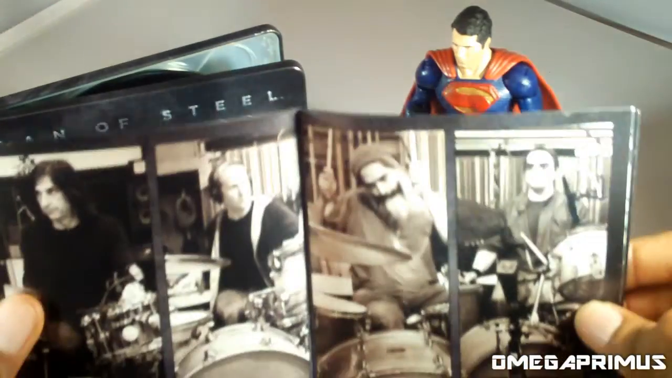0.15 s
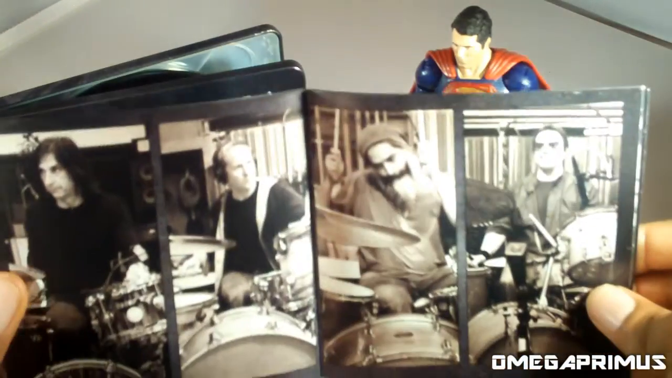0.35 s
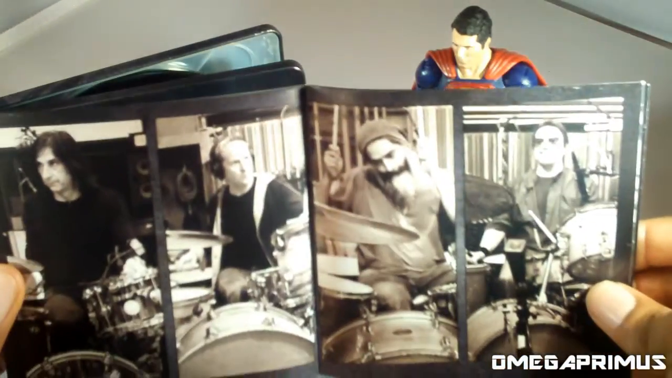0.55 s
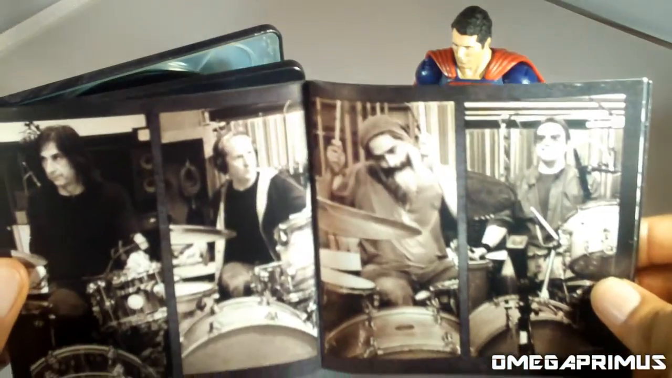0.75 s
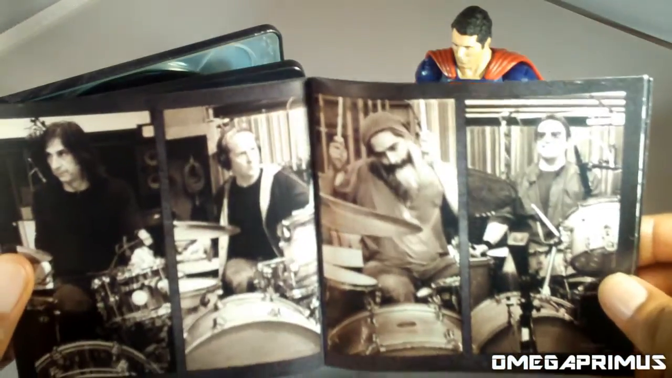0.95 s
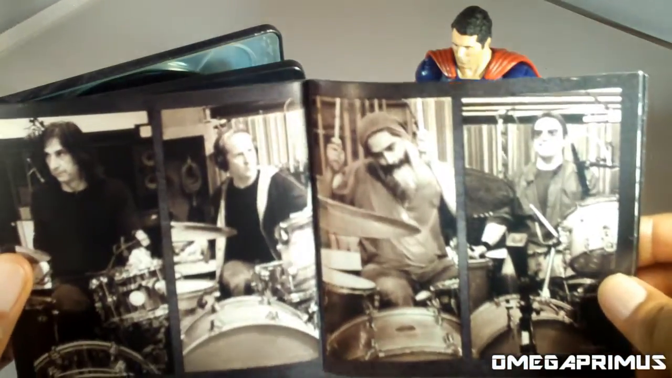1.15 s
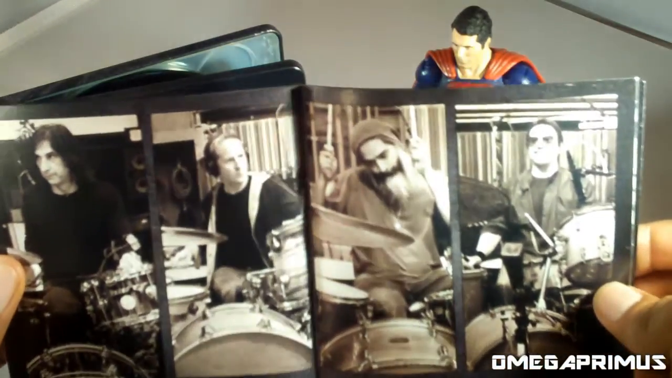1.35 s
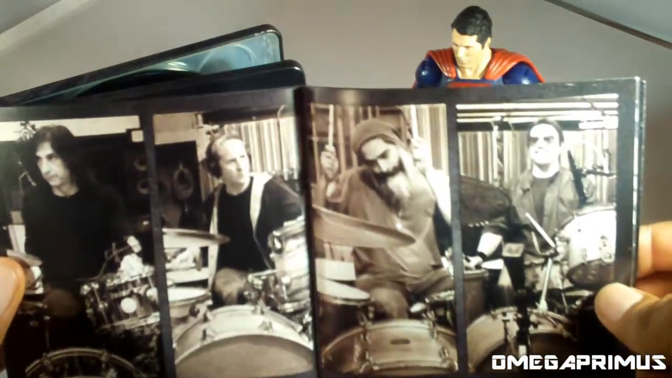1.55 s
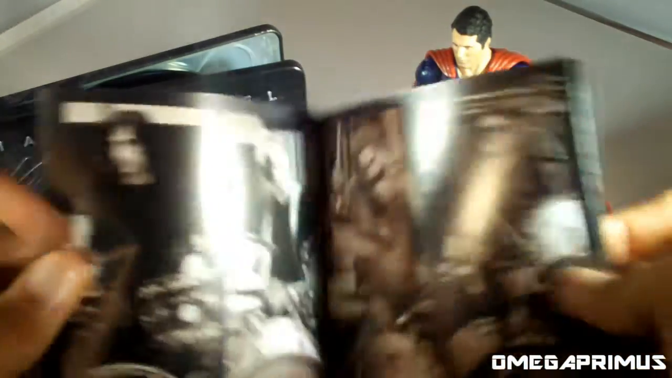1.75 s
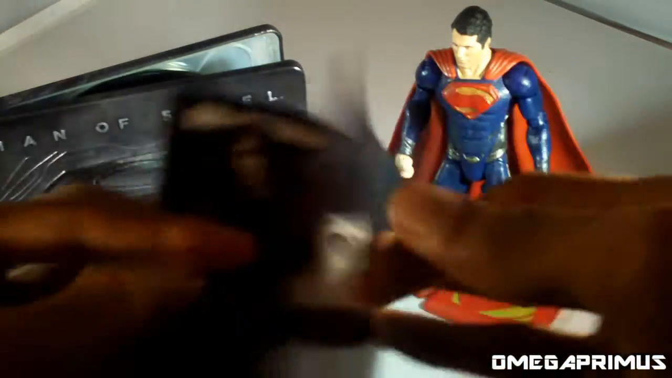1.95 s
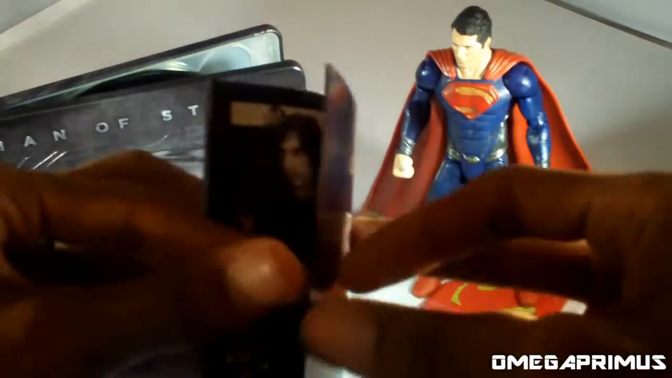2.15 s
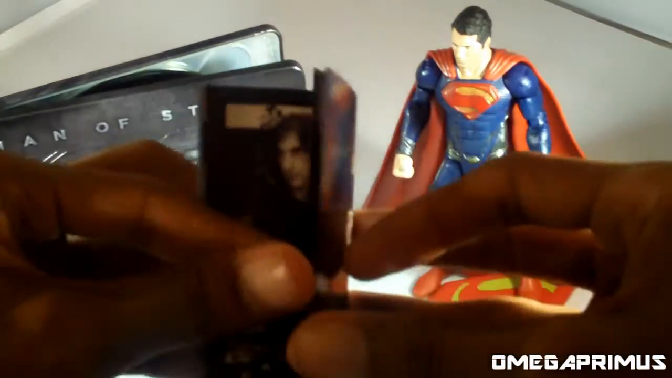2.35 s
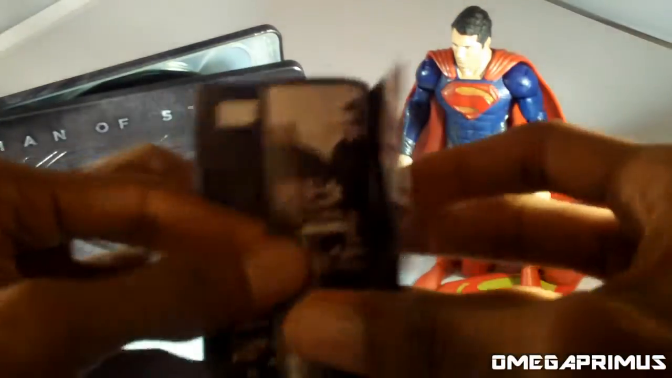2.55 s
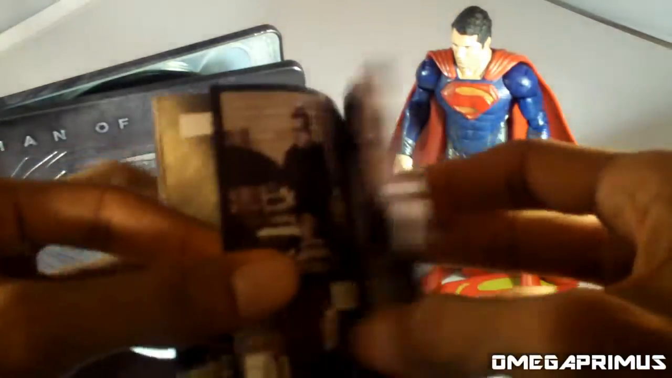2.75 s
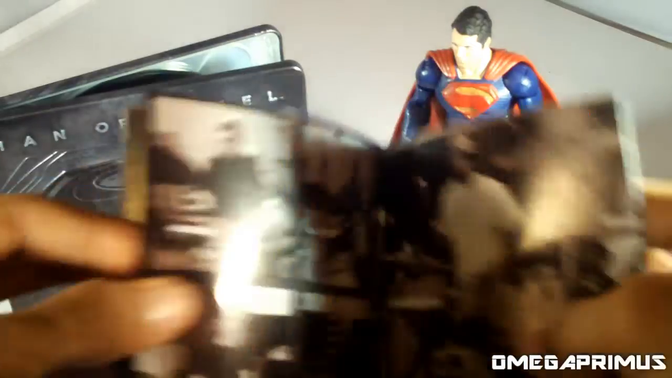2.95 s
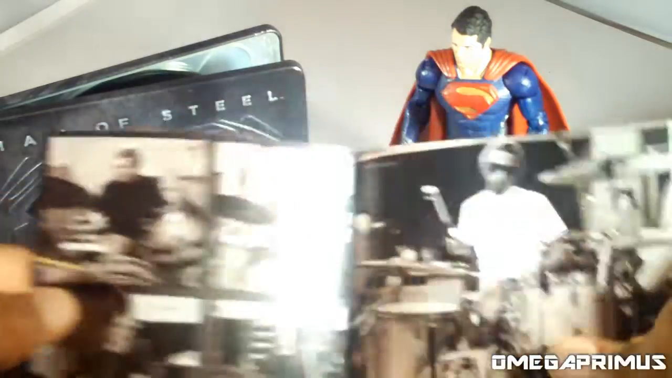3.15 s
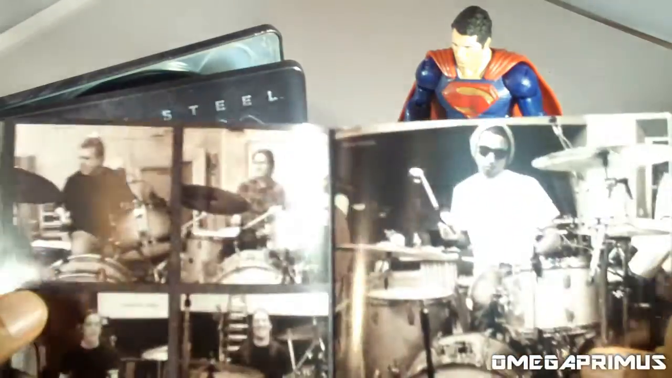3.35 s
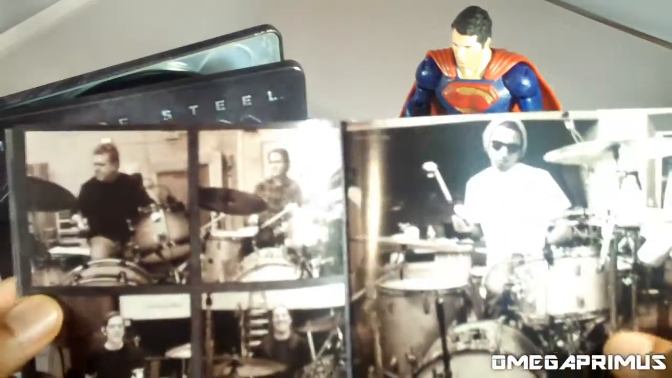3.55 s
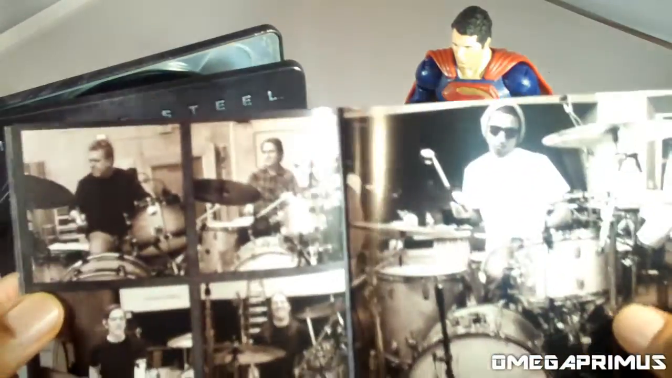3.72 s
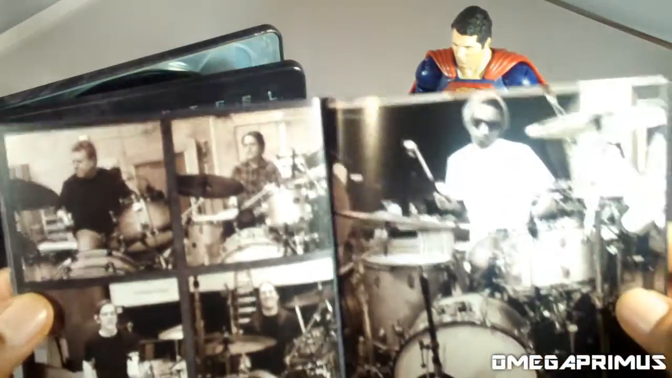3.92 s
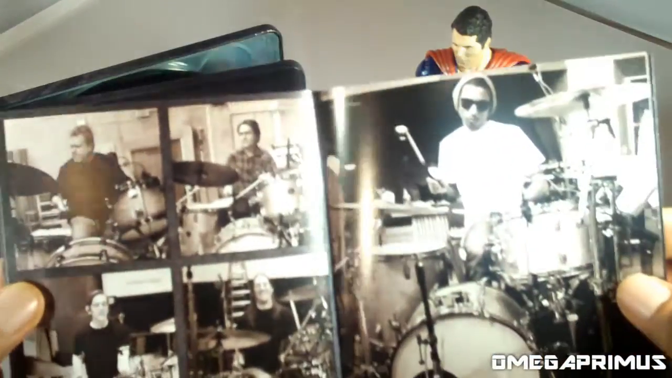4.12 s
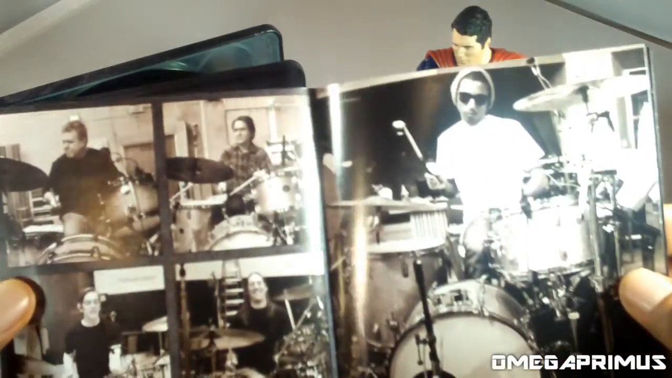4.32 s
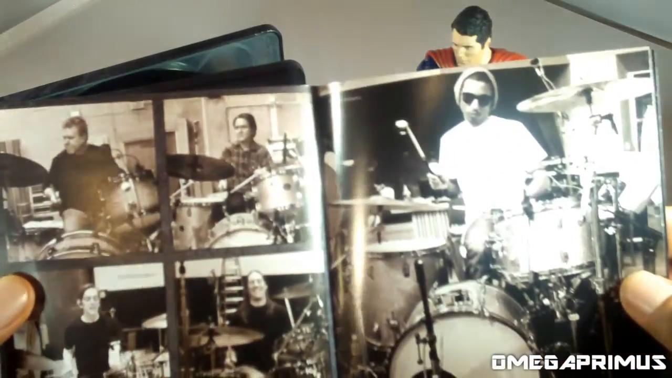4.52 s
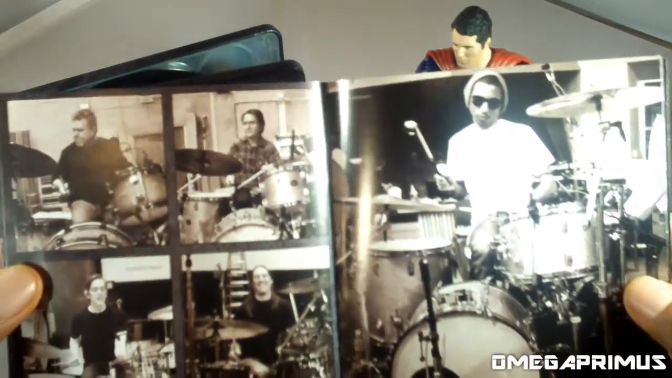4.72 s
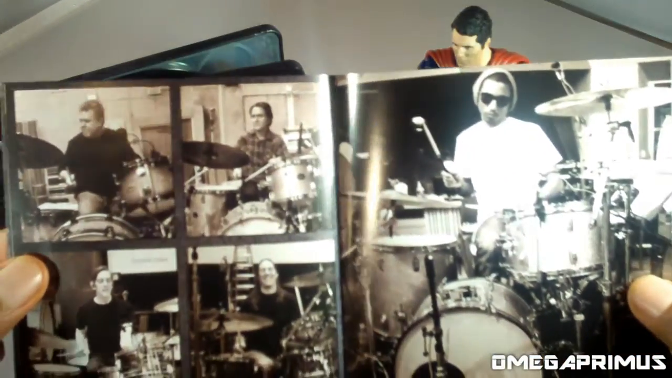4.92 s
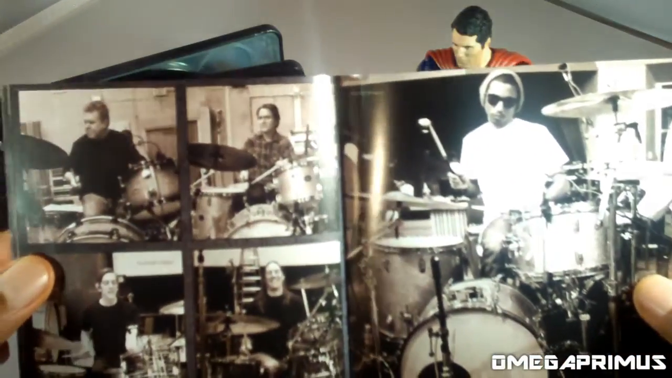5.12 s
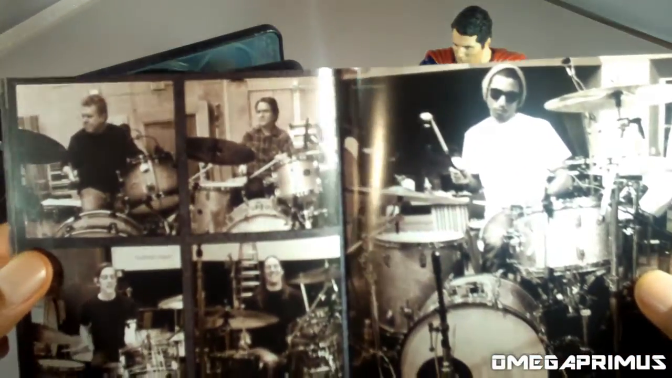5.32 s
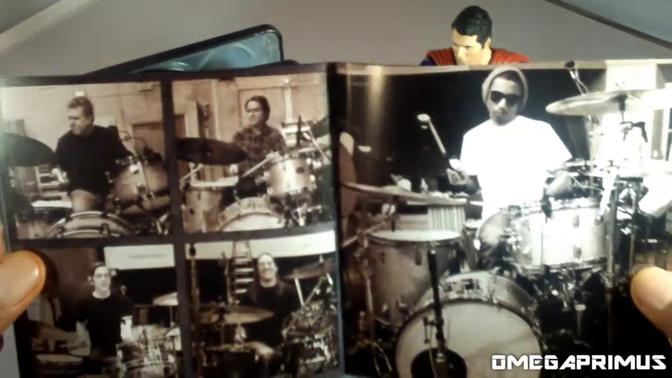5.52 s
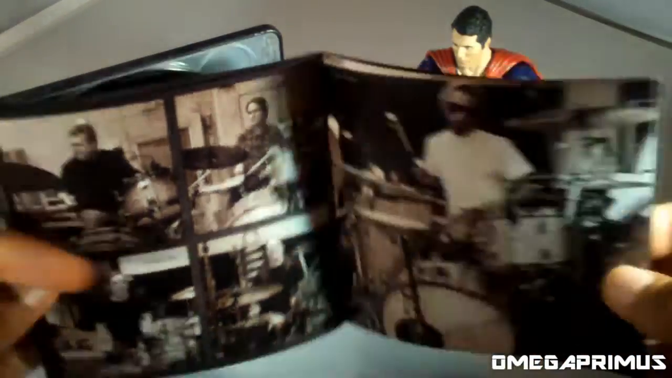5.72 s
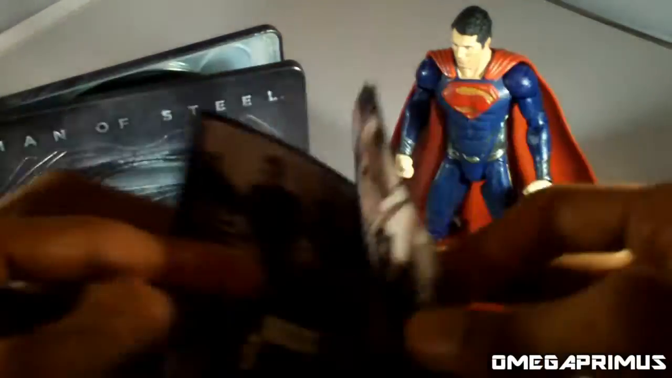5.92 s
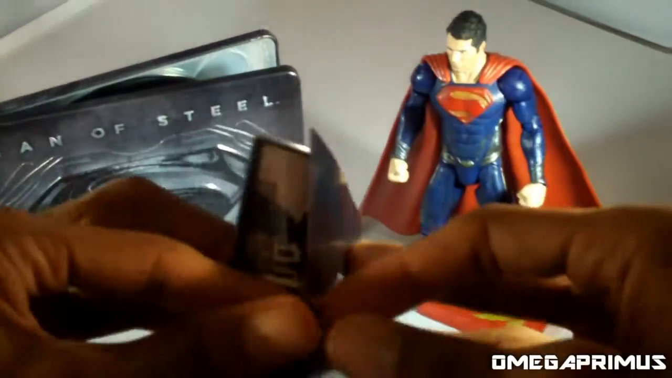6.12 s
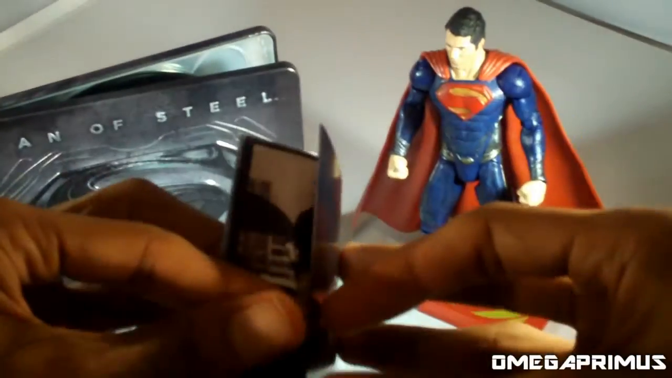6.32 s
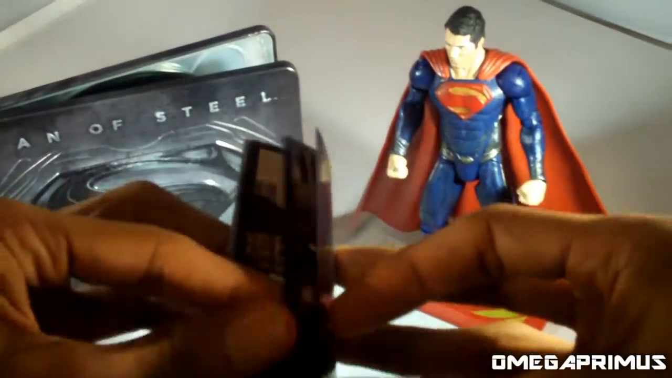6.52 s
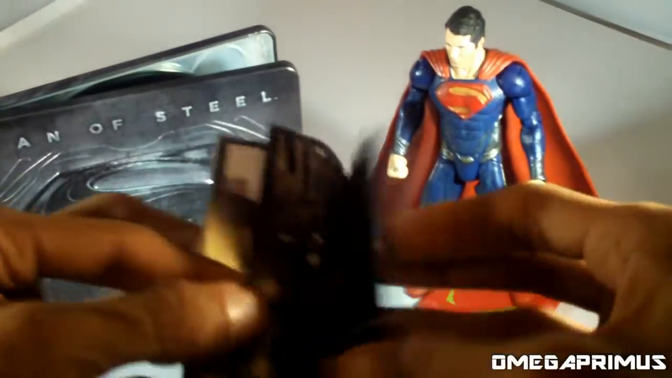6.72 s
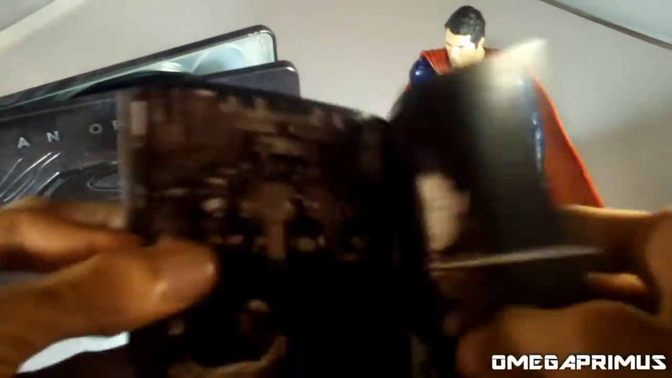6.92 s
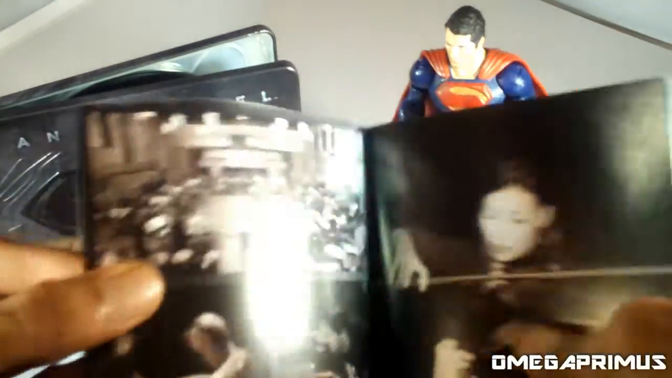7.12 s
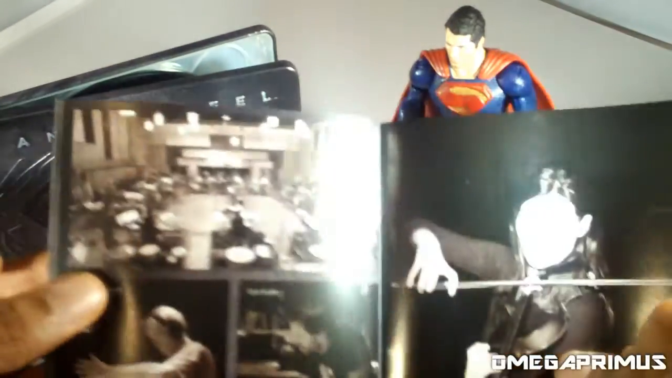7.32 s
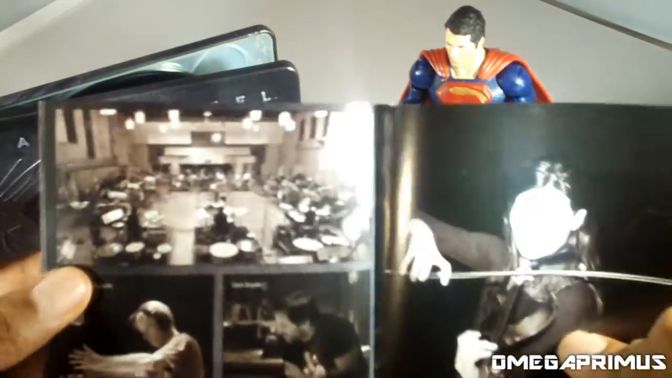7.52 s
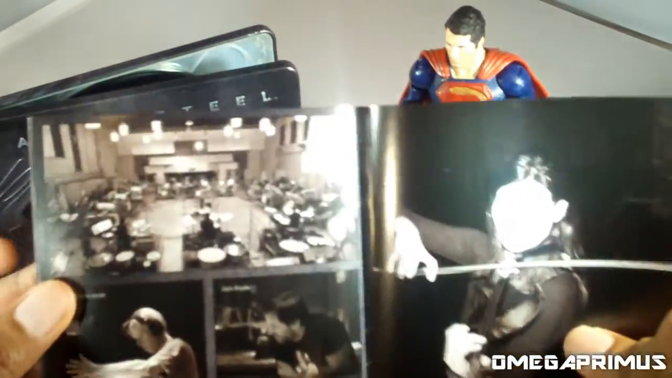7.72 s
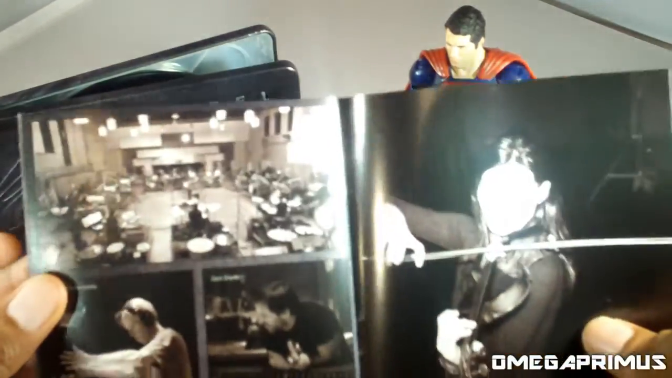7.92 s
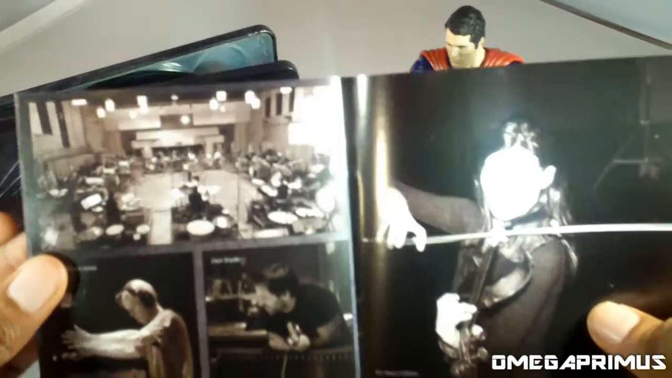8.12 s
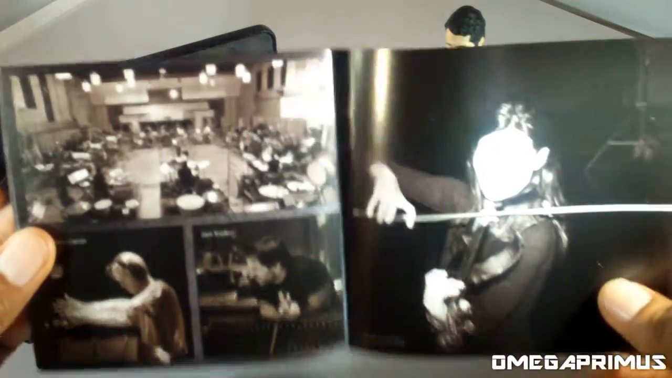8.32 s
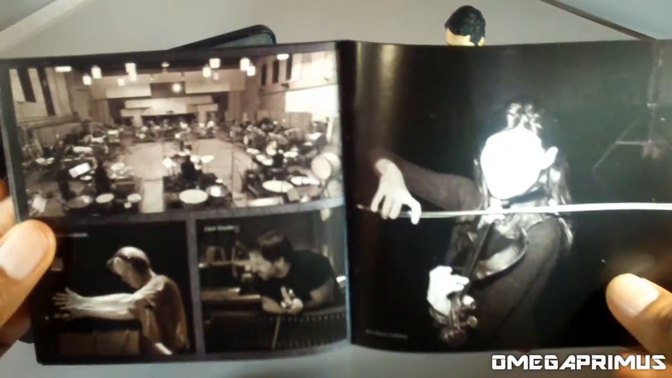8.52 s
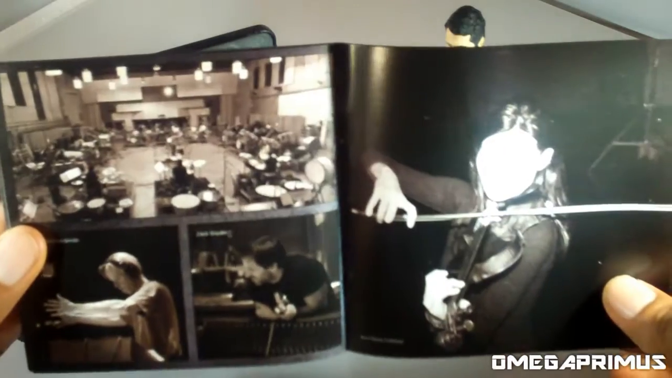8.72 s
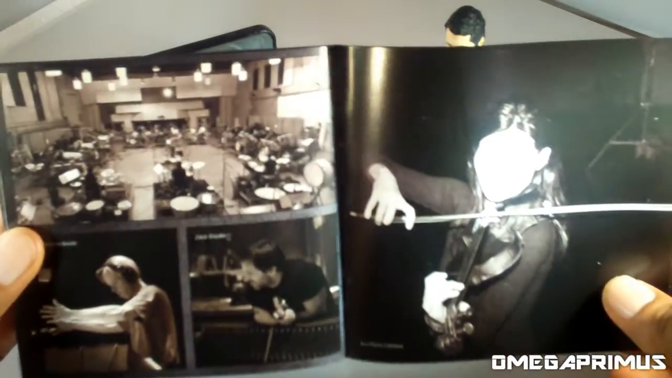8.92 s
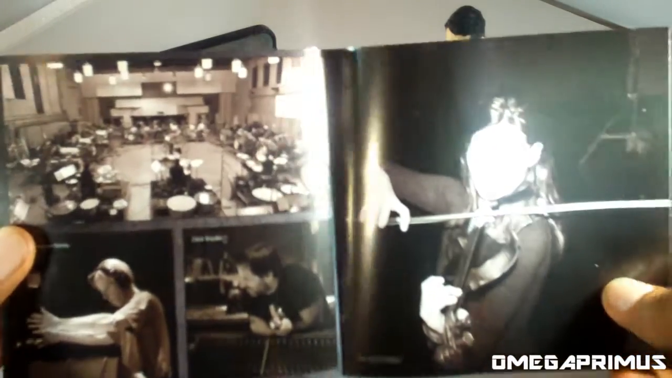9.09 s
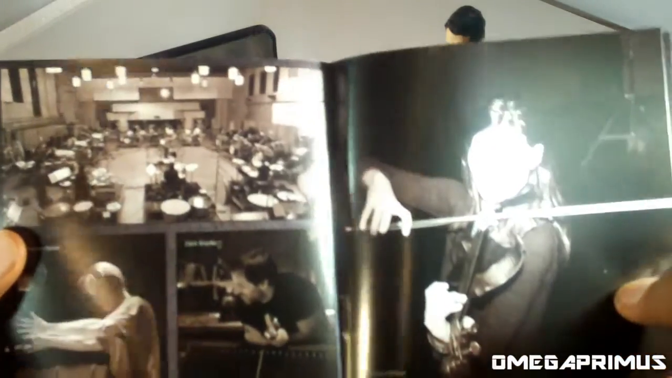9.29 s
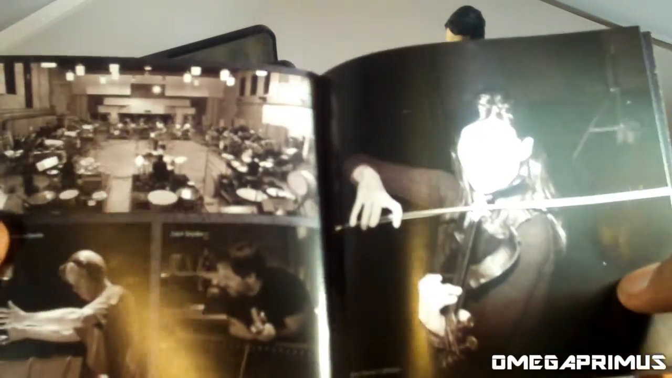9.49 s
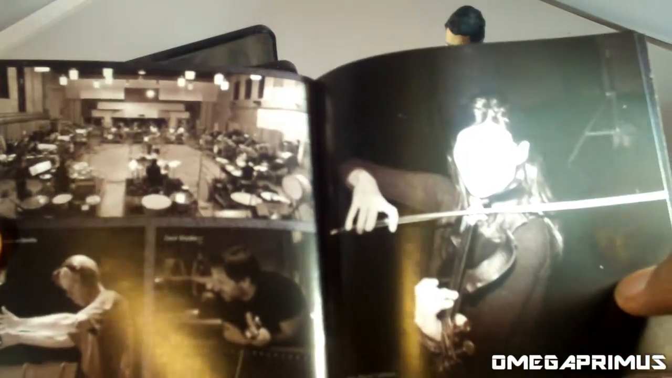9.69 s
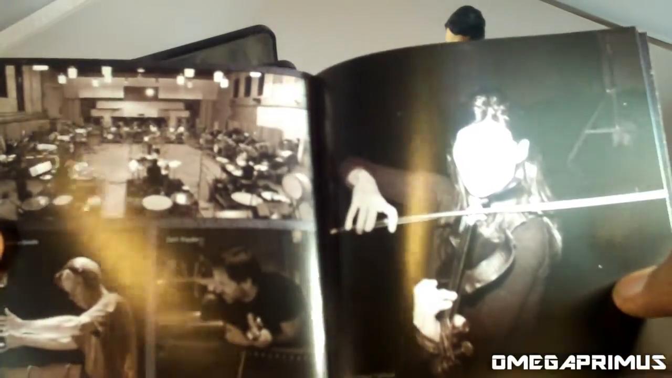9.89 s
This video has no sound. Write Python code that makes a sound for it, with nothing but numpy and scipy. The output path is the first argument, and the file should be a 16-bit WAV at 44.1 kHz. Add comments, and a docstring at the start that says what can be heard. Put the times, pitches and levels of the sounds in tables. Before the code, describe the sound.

Three bursts of crisp paper flicking and snapping, separated by near-quiet holds with soft finger rubs, in a small quiet room.

```python
"""A glossy booklet is leafed through by hand, close to a camera's two microphones in a quiet room.
Snaps and slaps are cracks followed by bending waves; swishes and rubs are stick-slip noise coloured
by the sheet's resonances; bumps are dull bursts of low noise. Sparse reflections add the room.
Behind lie a low room rumble, mains hum, thin whines and the faint pulsing hiss of the camera."""
import sys
import numpy as np
from scipy import signal
from scipy.fft import rfft, irfft
from scipy.io import wavfile
from scipy.ndimage import uniform_filter1d

SR = 44100
rng = np.random.default_rng(int(sys.argv[2]) if len(sys.argv) > 2 else 0)


def master_out(mix):
    """Clip the mix to full scale and print it as 16-bit PCM to the path in sys.argv[1]."""
    frames = np.transpose(np.atleast_2d(mix))
    ceiling = np.clip(frames, -1, 1)
    pcm = np.round(ceiling * 32767).astype(np.int16)
    wavfile.write(sys.argv[1], SR, pcm)


N = 438794  # length [samples]


def gain_of(db):
    """Decibels to amplitude."""
    return 10 ** (np.asarray(db) / 20)


def evened(x):
    """Scales to rms 1."""
    return x / np.sqrt(np.mean(x ** 2) + 1e-20)


def read(points, hz):
    """Reads a curve on a log-frequency axis."""
    point_hz, value = np.transpose(points)
    return np.interp(np.log(hz + 1), np.log(point_hz + 1), value)


def add(mix, s, sound):
    """Mixes a sound in at time s."""
    part = mix[max(round(s * SR), 0):][:len(sound)]
    part += sound[:len(part)]


def drift(rate_hz):
    """Random wander of rms 1, made of noise below about rate_hz."""
    hz = np.fft.rfftfreq(N, 1 / SR)
    return evened(irfft(rfft(rng.standard_normal(N)) / (1 + (hz / rate_hz) ** 4), N))


def stereo_noise(spectrum, side_db):
    """Coloured noise of rms 1 at two microphones set close together."""
    hz = np.fft.rfftfreq(N, 1 / SR)
    mid, side = rfft(rng.standard_normal((2, N))) * gain_of(read(spectrum, hz))
    side = side * gain_of(read(side_db, hz))
    return evened(irfft(np.array([mid + side, mid - side]), N))


# low rumble of the room: (frequency [Hz], relative level [dB])
RUMBLE_SPECTRUM = [(10, -3), (20, 1), (48, -1), (65, -6.5), (100, -8.5), (180, -14), (300, -16.5),
                   (400, -20.5), (500, -27), (570, -45.5), (900, -61)]
# how far the rumble differs between the microphones: (frequency [Hz], side minus mid [dB])
RUMBLE_SIDE = [(20, -13), (45, -19), (90, -3.5), (150, -16), (500, -23)]


def room_rumble(level_db=-52.5, flutter_db=1.1):
    """Steady low noise of the place, its level fluttering slightly and quickly."""
    return gain_of(level_db + flutter_db * drift(14)) * stereo_noise(RUMBLE_SPECTRUM, RUMBLE_SIDE)


# hiss of the microphones: (frequency [Hz], relative level [dB])
HISS_SPECTRUM = [(300, -11), (560, -18), (680, -3), (870, 1.5), (1800, -2), (3500, -6.5), (7000, -11),
                 (9800, -4.5), (10500, -11.5), (13000, -11.5), (15000, -11.5)]
# how far the hiss differs between the microphones: (frequency [Hz], side minus mid [dB])
HISS_SIDE_LEVELS = [(600, -15), (1000, -16), (3000, -11), (6500, -6.5), (8500, -36.5), (11000, -8)]


def microphone_hiss(level_db=-62.0):
    """Steady coloured noise of the microphones."""
    return gain_of(level_db) * stereo_noise(HISS_SPECTRUM, HISS_SIDE_LEVELS)


# mains hum and thin electronic whines: (frequency [Hz], rms level [dB], rms wander [Hz])
HUM_AND_WHINES = [(120.7, -60.5, 1.07), (7370, -83, 4.2), (7830, -78.5, 4.1), (10000, -93, 4.4),
                  (14985, -82.5, 45)]


def hum_and_whines():
    """Sines whose pitch wanders at random, alike at both microphones."""
    out = np.zeros(N)
    for hz, db, wander_hz in HUM_AND_WHINES:
        phase = 2 * np.pi * np.cumsum(hz + wander_hz * drift(11)) / SR
        out += gain_of(db) * np.sqrt(2) * np.sin(phase)
    return out


# hiss band of the camera's electronics: (frequency [Hz], relative level [dB])
BUZZ_SPECTRUM = [(6800, -44), (7550, -18), (7780, 4), (8200, 2.5), (8900, 0.5), (9300, -40), (11500, -10),
                 (14000, -37)]
# how far this band differs between the microphones: (frequency [Hz], side minus mid [dB])
BUZZ_SIDE_LEVELS = [(7000, -44), (14000, -31)]


def electronics(level_db=-63.5, frame_db=3.5, third_db=2.3, ripple_db=3.0):
    """A band of hiss that pulses with the camera's thirty frames a second."""
    turn = 2 * np.pi * 30 * np.arange(N) / SR
    # pulses at 30, 90 and 120 Hz
    pulsing_db = frame_db * np.cos(turn) + third_db * np.cos(3 * turn) + ripple_db * np.sin(4 * turn)
    return gain_of(level_db) * evened(stereo_noise(BUZZ_SPECTRUM, BUZZ_SIDE_LEVELS) * gain_of(pulsing_db))


# how long the room rings: (frequency [Hz], time to fall by 60 dB [s])
ROOM_DECAY = [(200, 0.67), (1000, 0.17), (4000, 0.073), (14000, 0.25)]


def room(x, wet_db=-19, width=0.028, size=16384):
    """A small furnished room: sparse random reflections, dying at a different pace in each band."""
    signs = rng.choice([-1., 1.], (2, size))
    present = rng.random((2, size)) < 3000 / SR  # reflections per second
    taps = signs * present * (np.arange(size) > .005 * SR)  # none in the first 5 ms
    hz, t, z = signal.stft(taps, SR, nperseg=256)
    decay_db = -60 * t / read(ROOM_DECAY, hz)[:, None]
    tails = signal.istft(z * gain_of(decay_db), SR, nperseg=256)[1]
    mid, side = signal.fftconvolve(x[None], tails / np.linalg.norm(tails[0]), axes=1)[:, :N]
    return x + gain_of(wet_db) * np.array([mid + width * side, mid - width * side])


# soft dull bumps of low noise:
# (time [s], level before the fade [dB], centre [Hz], fade length [s])
SOFT_BUMPS = [(0.14, -58, 540, 0.013), (0.79, -58, 487, 0.012), (1.12, -57.5, 520, 0.012),
              (3.737, -56, 600, 0.012), (4.235, -56, 580, 0.012), (4.964, -57, 493, 0.014),
              (6.095, -48.5, 205, 0.067), (6.31, -45.5, 435, 0.034), (8.484, -60, 520, .015),
              (9.083, -61, 505, 0.036)]
# a snap jolts the stack, the more so the stronger its body
JOLT_HZ, JOLT_S, JOLT_DB = 225, 0.011, -29.5
JOLT_GROWTH = 0.45  # dB of jolt per dB of snap body


def bumps(rise_s=0.00084, octaves=1.27, size=8192):
    """Dull bumps sound and snaps jolt the stack: each a quickly damped burst of band-limited noise."""
    out, t = np.zeros(N), np.arange(size) / SR
    jolts = [(s, JOLT_DB + JOLT_GROWTH * (db + body_db), JOLT_HZ, JOLT_S)
             for s, db, _, _, _, body_db, _, _ in PAGE_SNAPS]
    half_band = 2 ** (octaves / 2)
    for s, db, hz, length in SOFT_BUMPS + jolts:
        band = signal.butter(2, [hz / half_band, hz * half_band], "bandpass", fs=SR, output="sos")
        shudder = evened(signal.sosfilt(band, rng.standard_normal(size)))
        envelope = (1 - np.exp(-t / rise_s)) * np.exp(-(t / length) ** 2)
        add(out, s, gain_of(db) * shudder * envelope)
    return out


def paper(hz, ring_hz, ring_q, body_hz, body_q, body_db, edge_db, lowest_hz,
          skirt=0.56, edge_hz=8500, edge_q=1.86, top_hz=13500):
    """Gain of a sheet: the ring of its bent part, the lower body of the whole page, the fizz of its edge."""
    hz = hz + 1  # keeps clear of zero
    up, low = hz / ring_hz, hz / body_hz
    ring = 1 / (1 + (ring_q * (up - 1 / up)) ** 2) / (1 + (skirt / up) ** 4)
    body = gain_of(body_db) ** 2 / ((1 - low ** 2) ** 2 + (low / body_q) ** 2)
    body = body / (1 + (lowest_hz / hz) ** 6)
    edge = gain_of(edge_db) ** 2 / (1 + (edge_q * (hz / edge_hz - edge_hz / hz)) ** 2)
    power = (ring + body + edge) / (1 + (hz / top_hz) ** 6)
    return np.sqrt(power / power.mean(0))


RISE_S, RISE_SHARE, RELEASE_S = 0.013, 0.099, 0.011  # a long stroke gathers speed more slowly


def stroke(t, start, length, db, swell_db):
    """Amplitude of one sliding movement: a rise, a hold that swells or fades, a release."""
    rise = np.clip((t - start) / (RISE_S + RISE_SHARE * length), 0, 1)
    along = np.clip((t - start) / length, 0, 1)
    release = np.exp(-np.maximum(t - start - length, 0) / RELEASE_S)
    return rise * gain_of(db + swell_db * (along - .5)) * release


# one sheet swishing over another: (start [s], length [s], level [dB],
# swell from start to end [dB], ring [Hz], body [dB], crisp edge [dB])
SHEET_SWISHES = [(0, 0.071, -51, -14, 5870, -2.5, 2), (1.8, 0.098, -55.5, 2, 3440, -7, -4),
                 (1.974, 0.078, -50.5, 1, 3200, -1, 1), (2.512, 0.064, -50, 7, 3620, -8, -6),
                 (2.626, 0.04, -48.5, 6, 3100, -12, -10), (2.764, 0.023, -50, -3, 3500, -7, -1),
                 (2.832, 0.055, -52.5, 0, 4370, -9, -22), (2.885, 0.09, -51.5, -2, 3700, -7, -5),
                 (3.007, 0.065, -46, -3, 4000, -14.5, -6), (3.084, 0.073, -50, -2, 4240, -9, -8),
                 (3.214, 0.071, -53, 6, 3500, -1, 4), (3.295, 0.058, -44.5, 3, 3870, -12, -5),
                 (5.83, 0.069, -51.5, 9, 5470, -5, 6), (5.897, 0.079, -49, -5, 3500, -5.5, -8),
                 (6.048, 0.037, -47.5, 13.5, 4240, -5.5, -1), (6.09, 0.038, -51, -2, 3800, 3, -6),
                 (6.576, 0.17, -52, 2, 3420, -11, -4), (6.838, 0.058, -51, 8, 3400, -7, 1),
                 (6.878, 0.097, -43.5, -1, 3450, -15, -9), (6.971, 0.047, -43.5, 4.5, 3960, -19, -13),
                 (7.228, 0.069, -44, -8, 3200, -5, 5)]
# fingertips sliding on the gloss as the grip settles: (start [s], length [s], level [dB])
FINGER_RUBS = [(0.125, 0.035, -59.5), (2.28, 0.084, -59.5), (3.378, 0.058, -62), (3.441, 0.083, -57),
               (3.803, 0.08, -55.5), (3.955, 0.074, -58), (7.356, 0.054, -56), (7.515, 0.078, -53),
               (7.59, 0.08, -50.5), (7.714, 0.071, -55.5), (7.815, 0.13, -48), (8.015, 0.02, -55.5),
               (8.2, 0.056, -59.5), (8.308, 0.051, -51), (8.369, 0.089, -54)]
# sheet under the fingertips: (ring [Hz], body at the usual level [dB], crisp edge [dB])
FINGER_COLOUR = (5700, -4, -30)
RUB_SWELL_DB, RUB_USUAL_DB = -3, -55
RUB_THINNING = 0.29  # each dB above the usual level takes this many dB from the body
# the booklet shifting in the hands: (start [s], length [s], level [dB])
HAND_SHIFTS = [(1.659, 1.91, -62.5), (3.57, 0.42, -66.5), (5.742, 0.45, -61), (6.191, 0.333, -67),
               (6.559, 1.2, -61)]
# faint rustle of that shifting: (ring [Hz], body [dB], crisp edge [dB])
RUSTLE_COLOUR = (3900, -3, -3)


def friction(t):
    """Summed amplitude of all strokes, and the sheet's ring, body and edge averaged by their power."""
    ring_hz, usual_body_db, edge_db = FINGER_COLOUR
    rubs = []
    for s, length, db in FINGER_RUBS:
        body_db = usual_body_db - RUB_THINNING * (db - RUB_USUAL_DB)
        rubs.append((s, length, db, RUB_SWELL_DB, ring_hz, body_db, edge_db))
    shifting = [(s, length, db, 0, *RUSTLE_COLOUR) for s, length, db in HAND_SHIFTS]
    strokes = np.array(SHEET_SWISHES + rubs + shifting)
    power = np.array([stroke(t, *row[:4]) ** 2 for row in strokes]) + 1e-20
    return np.sqrt(power.sum(0)), strokes[:, 4:].T @ power / power.sum(0)


# colour of friction on the glossy coating: (frequency [Hz], level [dB])
GLOSS_COLOUR = [(700, 4.5), (1300, -5.5), (2000, 1.5), (2600, 3), (3700, 2.5), (5000, 2), (7000, 2),
                (9500, 0), (13000, 1.5)]


def sliding(slips_per_s=1200, slip_spread_db=2.9, smooth_share=0.72, judder_db=1.56, patchy_db=3.0,
            ring_q=1.55, body_hz=1900, body_q=1.66):
    """Tiny stick-slips over smooth friction drive the sheet, whose resonances shift as it bends."""
    sizes = gain_of(slip_spread_db * np.minimum(rng.exponential(1, N), 5)) * rng.choice([-1, 1], N)
    slips = evened(sizes * (rng.random(N) < slips_per_s / SR))
    drive = np.sqrt(1 - smooth_share) * slips + np.sqrt(smooth_share) * rng.standard_normal(N)
    hz, at, z = signal.stft(drive, SR, nperseg=512, noverlap=384)
    level, (ring_hz, body_db, edge_db) = friction(at)
    sheet = paper(hz[:, None], ring_hz, ring_q, body_hz, body_q, body_db, edge_db, lowest_hz=547)
    # small resonances come and go with the changing bend
    patches = uniform_filter1d(rng.standard_normal(z.shape), size=4, axis=0)
    patches = evened(uniform_filter1d(patches, size=30, axis=1))
    z = z * sheet * gain_of(read(GLOSS_COLOUR, hz)[:, None] + patchy_db * patches)
    rub = evened(signal.istft(z, SR, nperseg=512, noverlap=384)[1][:N])
    return rub * np.interp(np.arange(N) / SR, at, level) * gain_of(judder_db * drift(35))


TICKS_PER_S, TICK_DB, TICK_SPREAD_DB = 3, -58, 3
# sheet in a tick: (ring [Hz], ring Q, body [Hz], body [dB], crisp edge [dB], crumple [dB])
TICK_SHEET = (3300, 0.5, 950, -6, -14, 9)


def stray_ticks():
    """Faint ticks at chance moments while the booklet shifts in the hands, as rows like PAGE_SNAPS."""
    ticks = []
    for start, length, _ in HAND_SHIFTS:
        times = start + np.cumsum(rng.exponential(1 / TICKS_PER_S, 40))
        levels = TICK_DB + TICK_SPREAD_DB * rng.uniform(-1, 1, 40)
        ticks += [(s, db, *TICK_SHEET) for s, db in zip(times, levels) if s < start + length]
    return ticks


# snaps, flicks and slaps of a sheet: (time [s], level over 10 ms [dB], ring [Hz], ring Q,
# body [Hz], body [dB], crisp edge [dB], crumple relative to the crack [dB])
PAGE_SNAPS = [(0.274, -47, 3270, 3.4, 1060, -7, -9.5, 0), (0.4097, -44, 3180, 2.8, 1010, -4, -6.5, 2),
              (0.6692, -55.5, 2520, 0.8, 850, -5, -26, 4), (0.9356, -49.5, 3050, 0.76, 1070, -6, -22, 1),
              (1.7664, -53, 4520, 1.1, 566, -2, -12, 3), (1.9422, -50.5, 3400, 1.5, 805, 2, -2, -2),
              (1.9906, -40, 1200, 0.79, 780, 2, -1.5, -8), (2.016, -49, 2700, 0.7, 880, -19, -6, 3),
              (2.0835, -38.5, 1650, 1.2, 734, -4, -25, 10), (2.09, -43, 1680, 6, 910, -20, -29, 5),
              (2.249, -51, 4360, 4.7, 890, -11, -26, 11), (2.5914, -45, 2640, 6.2, 660, -29, -15, -8),
              (2.6177, -34.5, 2850, 1.9, 740, -27, -12, -8), (2.7162, -27, 2370, 1.4, 650, -13, -29, -1.5),
              (2.724, -36.5, 2300, 1.5, 800, -28, -13, 6), (2.762, -22, 2520, 1.1, 636, -12.5, -32, -6.5),
              (2.8288, -50, 2340, 3.7, 660, -15, -30, 12), (3.0122, -39.5, 3400, 0.97, 835, -14, -25, -3),
              (3.0938, -46.5, 3000, 5.6, 740, -15, -11, -11), (3.216, -43, 1350, 4.4, 790, -1, -29, 3),
              (3.355, -34.5, 3920, 3.6, 1700, -13.5, -31, 4), (3.3656, -44, 2620, 3, 1680, -4, -32, 4),
              (5.7851, -53.5, 2440, 2.5, 950, -23, -5, -3), (6.042, -43, 3820, 1.9, 870, -12, -29, 1),
              (6.0961, -49, 1750, 0.7, 450, 13, -12, 4), (6.126, -47.5, 1390, 1.2, 700, -4, -10, 1),
              (6.1615, -52, 2940, 3.1, 1240, -13, -5, 2), (6.3092, -42.5, 2550, 1.3, 500, 2.5, -28, 3),
              (6.677, -37, 2980, 3.1, 830, -25, -7, -3), (6.7207, -24, 3250, 3, 634, -30, -7.5, -10),
              (6.888, -36.5, 2380, 1.7, 680, -19, -14, 1), (7.084, -44, 1350, 1.8, 640, -9, -21, 4),
              (7.155, -48, 1930, 1.2, 820, -5, -27, 3), (7.228, -26, 2200, 4.1, 955, -4, -27, -0.5),
              (7.2333, -30, 1950, 5.8, 1140, -15, -27, -1), (7.248, -29.5, 4100, 1.8, 1440, -23, -30, -3),
              (7.2649, -33.5, 1940, 1.7, 860, -16, -9, -5), (7.2783, -41.5, 1690, 1.3, 700, -12, -7, -17),
              (7.572, -44, 1220, 2.4, 1240, -5, -33, 9), (8.443, -54, 2140, 1.7, 870, -3, -28, 3),
              (9.028, -60.5, 4960, 3, 1700, -14, -11, 8), (9.501, -59, 3390, 1.3, 970, -5, -14, 10)]


def snaps(crumple_s=0.0044, flutter_s=0.017, flutter_db=-18, spread_s=0.00088, bend_s=.00017,
          fizz_hz=9000, size=4096):
    """Each snap is one sharp crack, then a few milliseconds of bending waves crossing the sheet."""
    out, t = np.zeros(N), np.arange(size) / SR
    signed_hz = np.fft.fftfreq(size, 1 / SR)
    hz = abs(signed_hz)
    dying = np.exp(-t / crumple_s) + gain_of(flutter_db) * np.exp(-t / flutter_s)
    dying = dying * (1 - np.exp(-(t / spread_s) ** 2))
    # the top treble sits less in the crack than in the fizz that follows it
    fizz = np.sqrt(np.hypot(1, (hz / fizz_hz) ** 2))
    for s, db, ring_hz, ring_q, body_hz, body_db, edge_db, crumple_db in PAGE_SNAPS + stray_ticks():
        gain = paper(hz, ring_hz, ring_q, body_hz, 2.8, body_db, edge_db, lowest_hz=.75 * body_hz)
        # causal colour: nothing sounds before the crack
        colour = np.exp(np.conj(signal.hilbert(np.log(gain + 1e-3))))
        # low bending waves travel slower than high ones, which smears the crack into a tiny chirp
        chirp = np.exp(-2j * np.pi * 2 * bend_s * np.sign(signed_hz) * np.sqrt(hz * ring_hz))
        crack = np.fft.ifft(colour * chirp / fizz).real
        noise = rng.standard_normal(size)
        waves = np.fft.ifft(colour * fizz * np.fft.fft(dying * noise)).real
        snap = evened(crack) + gain_of(crumple_db) * evened(waves)
        # the energy counts as if spread over 10 ms
        add(out, s, gain_of(db) * snap / np.linalg.norm(snap) * np.sqrt(SR / 100))
    return out


def scene():
    """The booklet in the room, close by, over the steady background."""
    background = room_rumble() + microphone_hiss() + hum_and_whines() + electronics()
    booklet = bumps() + sliding() + snaps()
    return background + room(booklet)


def record(dry, edge_hz=15400, offset=.107):
    """The camera's band limit; its two channels rest on opposite steady offsets."""
    lowpass = signal.firwin(401, edge_hz, window=("kaiser", 9), fs=SR)
    limited = signal.oaconvolve(dry, lowpass[None], "same")
    return limited + offset * np.array([[1], [-1]])


dry = scene()
out = record(dry)
master_out(out)
```